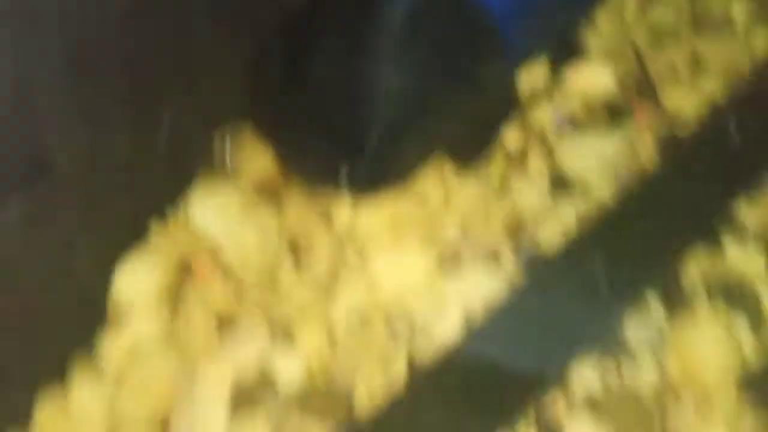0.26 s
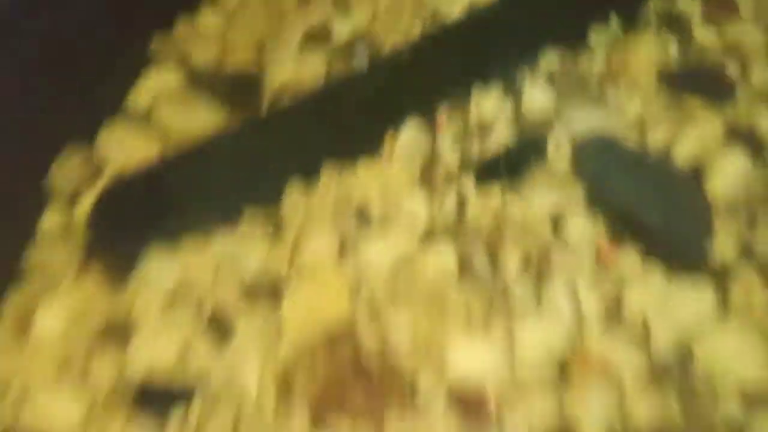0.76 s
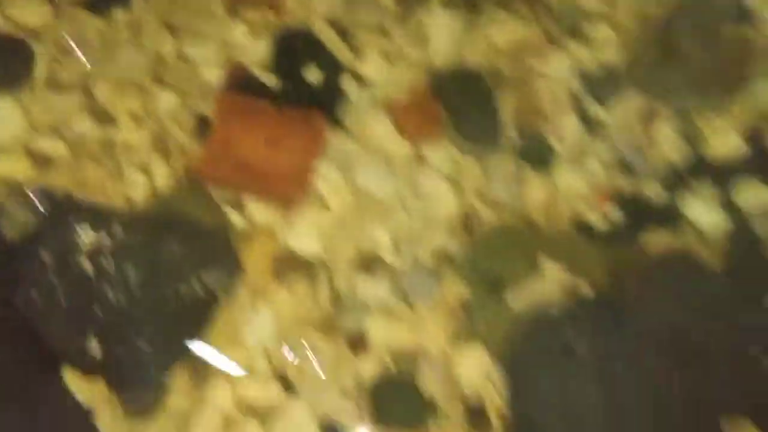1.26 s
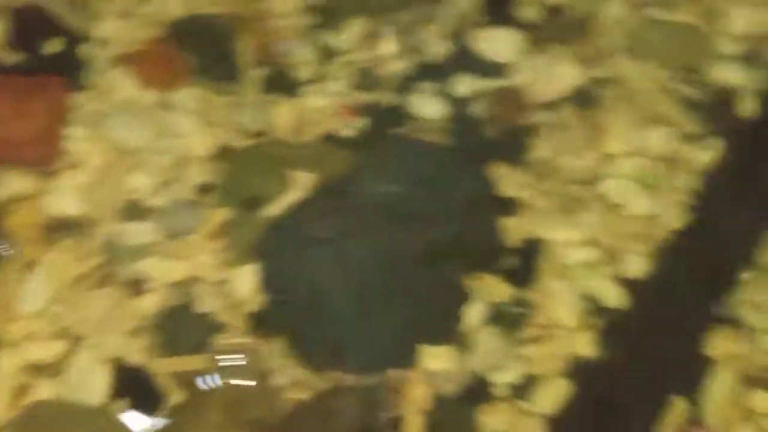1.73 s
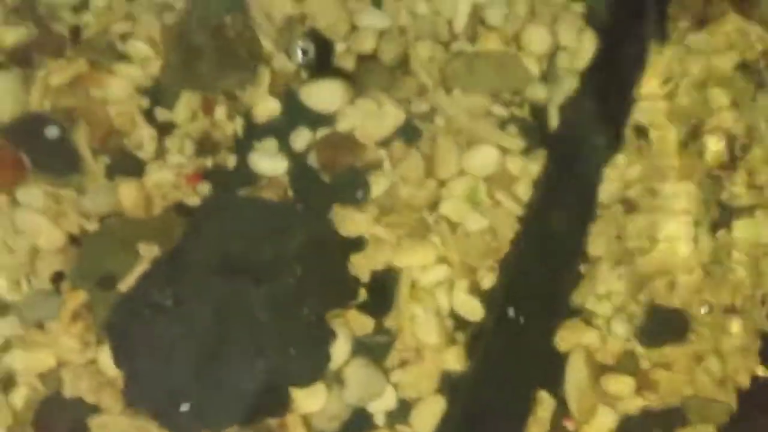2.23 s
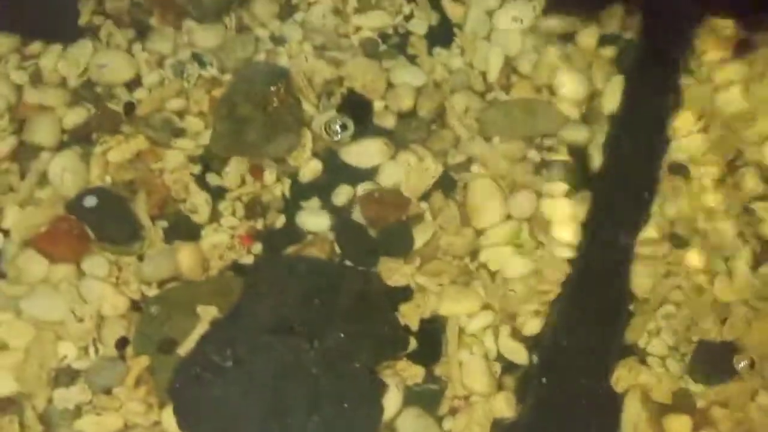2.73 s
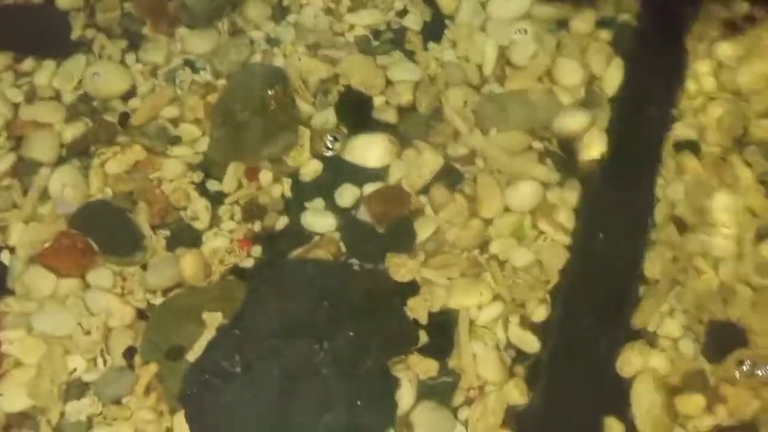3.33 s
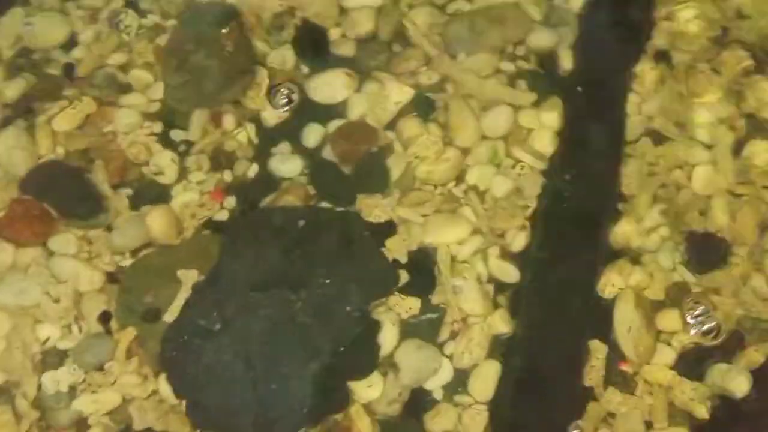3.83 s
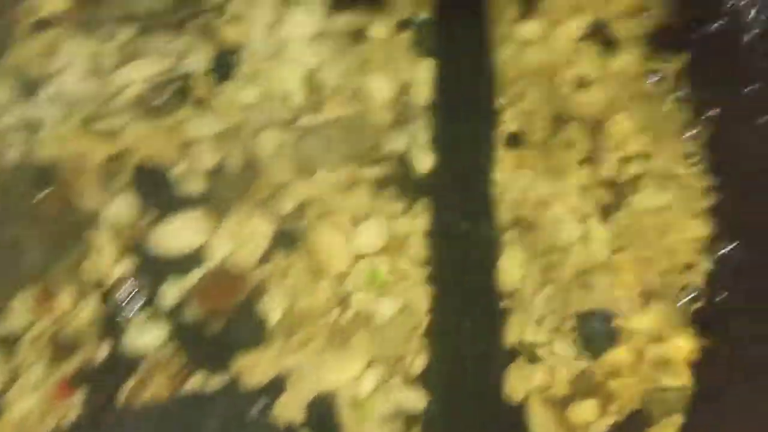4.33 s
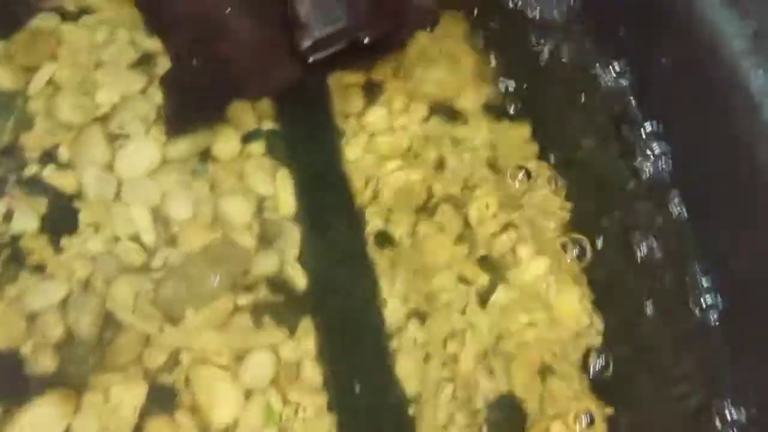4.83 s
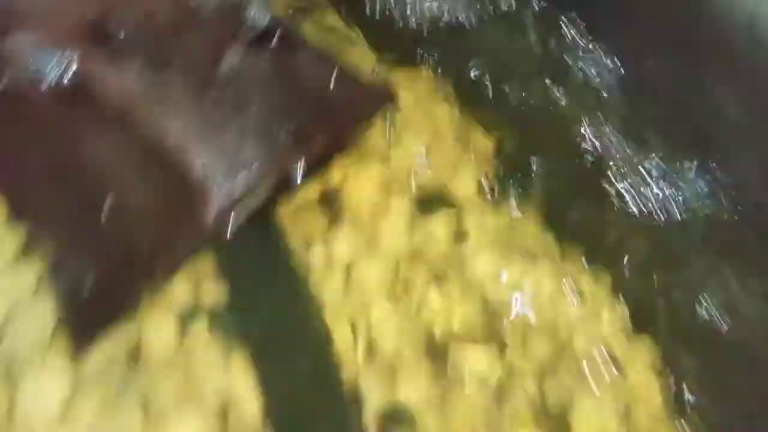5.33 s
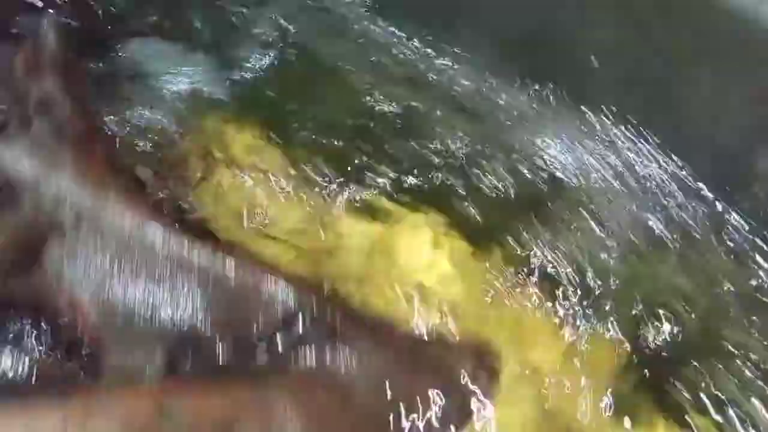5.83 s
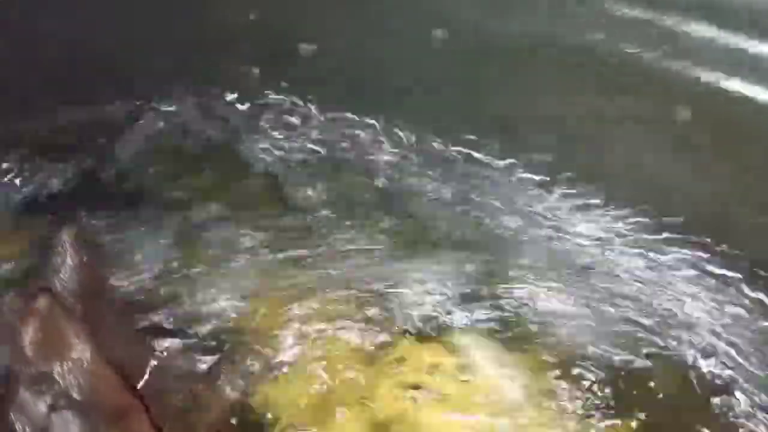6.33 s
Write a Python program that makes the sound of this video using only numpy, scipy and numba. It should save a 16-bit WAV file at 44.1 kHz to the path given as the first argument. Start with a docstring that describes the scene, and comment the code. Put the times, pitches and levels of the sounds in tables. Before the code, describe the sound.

An aquarium filter pump hums steadily while water bubbles, gurgles and fizzes in an indoor tub.

```python
"""Filter pump bubbling in an indoor tub

A pump under water hums at twice the mains rate, over a faint room rumble. Its outflow drags air under:
big bubbles gurgle, small ones fizz, pop and spit, and the air in the tub colours the steady churning.
The water echoes off the walls, and the echoes shift as a phone drifts above the surface."""
import sys
import numpy as np
from scipy import signal
from scipy.fft import rfft, irfft
from scipy.io import wavfile
from scipy.ndimage import uniform_filter1d
from numba import njit

SR = 44100
rng = np.random.default_rng(int(sys.argv[2]) if len(sys.argv) > 2 else 0)


def transcribe(u):
    """Save the signal u as a 16-bit wav file named by the first command-line argument.

    u: samples, shape (n,) or (channels, n), limited to [-1, 1]; the rate is SR.
    q: integer samples, one column per channel.
    """
    v = np.clip(np.atleast_2d(u).T, -1, 1)
    q = np.round(v * 32767).astype(np.int16)
    wavfile.write(sys.argv[1], SR, q)


N = 289296

# How loud the pump hums. Each row: time in seconds, level in dB.
HUM_LEVELS = [(0.0, -28.5), (0.03, -28), (0.56, -29.5), (0.66, -28), (1.42, -32.5), (1.64, -32),
              (1.95, -34), (2.19, -32), (2.56, -33.5), (5.02, -32.5), (5.22, -35), (5.32, -30.5),
              (5.44, -32.5), (5.75, -31), (6.21, -33), (6.28, -30.5), (6.52, -31), (6.56, -31)]


def undb(db):
    """Turn decibels into a number to multiply by."""
    return 10 ** (np.asarray(db) / 20)


def unit(x):
    """Scale a sound to an average power of 1."""
    return x / np.sqrt(np.mean(x ** 2))


def along(table):
    """Join a table's rows with straight lines: one curve for each column after the time."""
    times, *columns = np.transpose(table)
    return [np.interp(np.arange(N) / SR, times, column) for column in columns]


def wander(per_second):
    """A smooth random wobble, mostly between -1 and 1."""
    hold = int(SR / per_second)
    steps = np.repeat(rng.standard_normal(N // hold + 1), hold)
    return 1.35 * uniform_filter1d(uniform_filter1d(steps, hold), hold)[:N]


def band_noise(edges_hz):
    """Steady noise between a low and a high frequency."""
    bandpass = signal.butter(2, edges_hz, "band", fs=SR, output="sos")
    return unit(signal.sosfilt(bandpass, rng.standard_normal(N)))


def bursts(table, edges_hz, rise_s):
    """Short puffs of noise at the times and levels of a table."""
    times, db = np.transpose(table)
    hits = np.zeros(N)
    hits[(times * SR).astype(int)] = undb(db)
    age = np.arange(SR // 10) / SR / rise_s
    puff = np.e * age * np.exp(-age)
    return signal.fftconvolve(hits, puff)[:N] * band_noise(edges_hz)


@njit
def ring(length, start, size, cycles_per_sample, swell, rise):
    """Each bubble swells, then fades more slowly; its pitch climbs as it nears the surface."""
    out = np.zeros(length)
    for k in range(len(start)):
        phase = 0.
        for j in range(min(int(9 * swell[k]), length - start[k])):
            age = j / swell[k]  # 1 at the loudest moment
            phase += cycles_per_sample[k] * (1 + rise * (age - 1) / 2)
            out[start[k] + j] += size[k] * age * np.exp(1 - age) * np.sin(2 * np.pi * phase)
    return out


def bubbles(times, db, hz, cycles, rise):
    """Ringing bubbles; each time falls partway up the swell, and rise sets how fast the pitch climbs."""
    swell = np.maximum(cycles, 1.) * SR / hz / 2.45  # a ring stays within 6 dB for 2.45 swell times
    start = np.clip((times * SR - .6 * swell).astype(np.int64), 0, N - 1)
    return ring(N, start, undb(db), hz / SR, swell, rise)


def clusters(times, db, hz, cycles, rise, pitch_spread, follower_db=-10, trail_rings=1.212):
    """A bubble seldom comes alone: two weaker ones of nearly its size follow and roughen its ring."""
    out = bubbles(times, db, hz, cycles, rise)
    lags, detunes = rng.random((len(times), 2, 2)).T
    for lag, detune in zip(lags, detunes):
        later = times + trail_rings * lag * cycles / hz
        nearby_hz = hz * (1 + pitch_spread * (detune - .5))
        out += bubbles(later, db + follower_db, nearby_hz, cycles, rise)
    return out


def room_rumble():
    """Faint low noise of the room under the hum."""
    # Bands of rumble. Each row: frequency in Hz, level in dB.
    bands = [(35, -69), (82, -55.5)]
    return sum(band_noise([hz / 1.06, hz * 1.4]) * undb(db) for hz, db in bands)


def pump(hum_hz=100.11):
    """The motor's magnetic pull shakes the tub twice per mains cycle; a weak overtone rides on top."""
    phase = 2 * np.pi * hum_hz * np.arange(N) / SR + 0.21 * wander(6.6)
    overtone = undb(-25 + 2.5 * wander(8.3)) * np.cos(2 * phase + 1.2)
    level_db = along(HUM_LEVELS)[0] + 0.57 * wander(12)
    return np.sqrt(2) * undb(level_db) * (np.cos(phase) + overtone)


def tub_colour(x, low_hz, high_hz):
    """Keep one band of a sound, shaped by the water's tone and the ringing air in the tub."""
    # The tone of churning water. Each row: frequency in Hz, relative level in dB.
    water_tone = [(71, -24), (120, -13.5), (151, -13), (193, -12.5), (261, -17), (406, -20.5), (538, -21.5),
                  (701, -26), (946, -37.5), (2090, -38.5), (2930, -41.5), (4390, -37.5), (6590, -40.5),
                  (8150, -63.5), (10600, -97), (17900, -120)]
    # Pitches at which the tub's air rings. Each row: frequency in Hz, width in Hz, boost in dB.
    resonances = [(198.8, 15, 3.5), (317, 41, 5.5), (404.7, 32, 8.5), (690, 63, 6.5), (876, 61, 6.5),
                  (1008, 44, 4), (1554, 100, 4), (1754, 32, 6), (1950, 560, 3), (2143, 90, 4),
                  (2580, 550, 0.5), (2685, 82, 4), (3420, 380, 2.5), (4230, 980, 5), (4850, 250, 2)]
    hz = np.maximum(np.arange(N // 2 + 1) * SR / N, 1)
    water_hz, water_db = np.transpose(water_tone)
    db = np.interp(np.log(hz), np.log(water_hz), water_db)
    db += sum(boost / (1 + (2 * (hz - centre) / width) ** 2) for centre, width, boost in resonances)
    soft_edges = 1 / np.sqrt((1 + (low_hz / hz) ** 8) * (1 + (hz / high_hz) ** 8))
    return irfft(rfft(x) * undb(db) * soft_edges, N)


def churn(low_hz, high_hz, count, cycles, spread_db, over_blur_db, flicker_db, surge):
    """One band of bubbles, scattered at random over the blur of countless fainter ones."""
    when, pitch, length = rng.random((count, 3)).T
    db = spread_db * np.clip(rng.standard_normal(count), -2, 2)
    hz = low_hz * (high_hz / low_hz) ** pitch
    rings = bubbles(when * N / SR, db, hz, cycles * (.5 + length), rise=.05)
    blur = rng.standard_normal(N) * undb(flicker_db * wander(18))
    blur_in_band = np.sqrt(2 * (high_hz - low_hz) / SR)
    water = blur + undb(over_blur_db) * blur_in_band * unit(rings)
    return tub_colour(water * surge, low_hz, high_hz)


def outflow():
    """The outflow drags air under as five sizes of bubble, which surge together and slowly swell."""
    # Bubble sizes, big to small. Each row: lowest and highest pitch in Hz, bubbles per band, typical
    # cycles of ringing, spread of levels in dB, level over the blur in dB, flicker of the blur in dB.
    sizes = [(116, 260, 170, 4.3, 0, -2.5, -1), (262.5, 992, 260, 6.16, 0.5, -7.5, 1.5),
             (999.5, 2700, 500, 20, 1, -1.5, 1.17), (2719, 3900, 700, 25, -0.5, 8, 1.4),
             (3870, 9500, 1100, 25, 4, -2.5, 1.5)]
    # Swells of fizz. Each row: time in seconds, level of the finest and of the middle bubbles in dB.
    fizz = [(0.0, -49.5, -53.5), (0.36, -49.5, -52), (0.4, -44.5, -54), (0.46, -50, -49.5),
            (0.51, -49.5, -54.5), (0.58, -50, -51), (0.64, -50, -56), (0.71, -48.5, -49),
            (0.91, -52, -55.5), (1.3, -50.5, -53), (1.5, -49.5, -52.5), (1.6, -48, -54.5),
            (1.7, -51.5, -53), (1.85, -48.5, -57), (2.02, -50.5, -54), (2.14, -50.5, -47.5),
            (2.17, -50, -54.5), (2.89, -49, -55.5), (3.07, -50.5, -53.5), (3.2, -51, -54),
            (4.31, -49.5, -53.5), (4.48, -54, -56), (4.58, -45, -50.5), (4.69, -47, -52.5),
            (4.77, -49, -51.5), (5.11, -45, -53), (5.19, -51, -56), (5.6, -49, -53), (5.9, -47.5, -56),
            (6.15, -48, -56), (6.41, -49.5, -53), (6.52, -47.5, -58.5), (6.56, -46, -53)]
    # Swells of fine bubbles. Each row: time in seconds, level in dB.
    trickle = [(0.0, -55.5), (0.13, -49.5), (0.18, -54.5), (0.86, -51), (1.09, -53), (1.75, -55.5),
               (1.9, -48), (1.97, -52.5), (2.36, -55), (4.2, -55), (4.31, -52), (4.79, -54), (5.11, -51.5),
               (5.15, -50), (5.52, -55.5), (5.94, -52), (6.52, -55.5), (6.56, -57)]
    # Swells of large bubbles. Each row: time in seconds, level in dB.
    large = [(0.0, -52), (0.38, -52), (0.62, -49.5), (1.26, -51.5), (1.84, -49.5), (2.01, -51),
             (2.98, -48.5), (3.2, -52.5), (3.38, -53), (3.54, -49.5), (4.79, -50), (5.04, -48.5),
             (5.37, -51), (5.63, -48), (6.27, -48), (6.56, -45.5)]
    # How loud each size is. Each row: average level in dB, the shares it takes of the hum, finest,
    # middle, fine and large swells, and its change in dB as the phone drifts to the outflow.
    loudness = [(-48, 0.4, .05, 0.045, .03, .1, -1.8), (-49.5, 0.04, 0.059, 0.12, 0.027, .9, .5),
                (-52.5, 0.054, 0.046, 0.77, .12, .05, 0.7), (-53.5, 0.1, 0.09, .05, 1, .03, -0.6),
                (-49, 0.067, 0.75, .05, .06, .03, -0.2)]
    surge = undb(0.74 * wander(40))
    drift = np.arange(N) / N
    curves = along(HUM_LEVELS) + along(fizz) + along(trickle) + along(large) + [drift]
    swells = np.array([curve - curve.mean() for curve in curves])  # only the ups and downs count
    out = np.zeros(N)
    for (low_hz, high_hz, count, *texture), (db, *shares) in zip(sizes, loudness):
        edges = np.geomspace(low_hz, high_hz, num=4)  # three bands for each size
        water = sum(churn(low, high, int(count), *texture, surge) for low, high in zip(edges, edges[1:]))
        out += unit(water) * undb(db + np.array(shares) @ swells)
    return out


def spray():
    """Bursting bubbles spit spray in tiny, bright ticks."""
    # Spits of spray. Each row: start in seconds, level in dB.
    spits = [(0.54, -57), (0.659, -50), (2.33, -51), (3.24, -50), (4.875, -55), (4.915, -58), (5.38, -58),
             (5.965, -57), (6.09, -60), (6.449, -55), (6.508, -44.5)]
    return bursts(spits, edges_hz=(3600, 7000), rise_s=.0013)


def singing_bubbles():
    """Small bubbles that sing on a little longer in the air of the tub."""
    # Each row: time in seconds, peak level in dB, pitch in Hz, milliseconds within 6 dB of the peak.
    long_rings = [(0.018, -49, 1750, 13.5), (0.04, -43, 4260, 15), (0.068, -46, 4100, 12),
                  (0.162, -50, 2040, 15), (0.297, -45.5, 2050, 12), (0.309, -46, 3360, 13.5),
                  (0.338, -43.5, 3320, 12.5), (0.452, -49, 1750, 21), (0.545, -49, 1808, 18.5),
                  (0.59, -48, 3920, 13.5), (0.738, -48, 3300, 15), (0.808, -45, 3500, 12.5),
                  (0.832, -48, 3480, 11), (0.879, -51, 1640, 13), (2.43, -48, 1880, 11.5),
                  (2.45, -50, 2050, 12.5), (3.033, -49, 1733, 19), (3.07, -48, 2130, 20),
                  (3.33, -49, 2136, 13.5), (3.81, -47, 2050, 15), (3.826, -49, 1530, 11.5),
                  (3.84, -52, 2040, 15), (4.06, -54, 1900, 12), (4.105, -51, 1810, 14.5),
                  (4.155, -51, 1540, 14), (4.22, -49, 1860, 11.5), (3.86, -49, 1740, 17),
                  (4.263, -51, 1835, 18.5), (4.35, -46, 3560, 17.5), (4.571, -45, 3830, 11),
                  (4.575, -49, 4160, 16), (4.968, -52, 1835, 30.5), (5.048, -48, 2920, 17),
                  (5.121, -48, 4660, 13), (5.221, -50, 1930, 11.5), (5.224, -48, 2410, 10),
                  (5.341, -50, 3600, 14), (5.726, -39, 4300, 10), (6.128, -47, 4460, 10.5),
                  (6.333, -47.5, 1530, 13.5), (6.362, -47, 3300, 13), (6.408, -48, 3980, 11.5)]
    times, db, hz, ms = np.transpose(long_rings)
    return clusters(times, db, hz, ms * hz / 1000, rise=0.02, pitch_spread=.15)


def pops():
    """Small bubbles pop in loose clusters; the higher ones ring for more cycles."""
    # Each row: time in seconds, peak level in dB, pitch in Hz.
    small_bubbles = [(0.033, -37.5, 3520), (0.033, -39, 3940), (0.08, -41.5, 1750), (0.129, -36, 3900),
                     (0.132, -37, 3600), (0.349, -38.5, 2034), (0.243, -37, 4200), (0.332, -41, 5070),
                     (0.388, -33, 4140), (0.412, -40, 5530), (0.444, -37.5, 3325), (0.509, -42, 3260),
                     (0.459, -46, 2020), (0.643, -43, 4000), (0.657, -39, 3570), (0.658, -37, 4040),
                     (0.69, -44, 3540), (0.699, -40, 4180), (0.709, -42, 4300), (0.715, -44, 3750),
                     (0.744, -41, 3960), (0.732, -45, 1600), (0.868, -45, 1900), (0.879, -51, 1695),
                     (0.893, -42, 4330), (0.957, -43.5, 2780), (0.71, -44, 1830), (0.73, -35.5, 4060),
                     (0.737, -36.5, 3890), (0.761, -36, 4130), (0.779, -44, 1790), (0.864, -38, 3500),
                     (0.893, -39, 3560), (0.93, -41, 3800), (1.021, -42, 3460), (1.101, -43, 1680),
                     (1.428, -40, 1270), (1.563, -39, 4080), (1.594, -37.5, 3950), (1.833, -39, 5600),
                     (1.909, -39, 3730), (1.989, -41, 4600), (2.03, -39, 2160), (2.325, -41, 5470),
                     (2.334, -42, 5760), (2.35, -43, 5550), (2.418, -44, 1680), (2.815, -47, 1470),
                     (2.576, -37.5, 4250), (3.031, -50, 1750), (3.125, -45, 2140), (3.24, -40.5, 6240),
                     (3.722, -41, 4760), (3.809, -41, 2100), (3.921, -40, 3700), (4.01, -49, 2060),
                     (4.078, -47, 1490), (4.125, -49, 1920), (4.195, -45, 1900), (4.091, -39, 4560),
                     (4.136, -44, 1730), (4.301, -46, 1380), (4.348, -41.5, 2180), (4.496, -41, 3680),
                     (4.582, -37, 4540), (4.683, -41, 4000), (4.686, -43, 4500), (4.614, -41, 2070),
                     (4.874, -40.5, 6360), (4.88, -41, 4830), (4.915, -39, 5430), (5.028, -45, 4660),
                     (5.074, -40, 2450), (5.074, -43, 2700), (5.095, -47, 3000), (5.162, -44, 1900),
                     (5.338, -37, 4330), (5.379, -39.5, 5200), (5.401, -35, 4020), (5.462, -45, 2720),
                     (5.617, -36, 4160), (5.62, -40, 4440), (5.673, -38.5, 4240), (5.641, -42, 4160),
                     (5.704, -44, 4100), (5.799, -37, 4430), (5.861, -42, 3283), (5.89, -48, 3240),
                     (5.952, -40, 3380), (5.97, -43, 1630), (5.989, -38, 4570), (6.06, -38, 4420),
                     (6.09, -42, 6320), (6.111, -38, 4140), (6.164, -39, 5300), (6.208, -44, 1264),
                     (6.353, -38, 4020), (6.469, -42.5, 5940), (6.458, -40, 4070), (6.509, -35, 4330),
                     (6.509, -35, 4820), (6.509, -40, 5620)]
    times, db, hz = np.transpose(small_bubbles)
    cycles = 7 + 1.7 * hz / 1000
    return clusters(times, db, hz, cycles, rise=0.03, pitch_spread=.2, follower_db=-7, trail_rings=2)


def gurgles():
    """Big bubbles ring low; the surface slaps shut over some with a short, wet burst."""
    # Each row: time in seconds, peak level in dB, pitch in Hz, cycles within 6 dB of the peak.
    big_bubbles = [(0.12, -49, 690, 20), (0.28, -55, 680, 8), (0.387, -46.5, 623, 9),
                   (0.43, -44.5, 690, 14.5), (0.175, -34, 424, 3), (0.186, -41.5, 644, 8.5),
                   (0.454, -43, 830, 8), (0.542, -38, 424, 10), (0.556, -37, 680, 3.5),
                   (0.22, -41, 200, 6.5), (0.35, -43, 200, 6.5), (0.42, -35, 205, 7), (0.663, -34, 200, 7),
                   (0.779, -38.5, 215, 4), (0.824, -35, 217, 3), (0.877, -36, 262, 4.5),
                   (0.888, -44.5, 478, 10.5), (0.931, -45, 660, 13), (0.955, -40.5, 292, 7),
                   (1.055, -35, 213, 3.5), (1.058, -43, 664, 7), (1.12, -49, 667, 12),
                   (1.13, -41, 196, 5.5), (1.163, -46, 640, 7.5), (1.19, -32.5, 199, 6.5),
                   (1.276, -37.5, 277, 4), (1.314, -41.5, 207, 5), (1.375, -37.5, 205, 7),
                   (1.498, -40, 420, 3.5), (1.526, -35, 219, 3.5), (1.641, -40, 410, 9.5),
                   (1.66, -46, 680, 7.5), (1.705, -40.5, 215, 7), (1.607, -40, 268, 3.5),
                   (1.693, -48, 690, 8.5), (1.736, -37, 380, 6), (1.746, -36, 420, 6),
                   (1.815, -46, 402, 6.5), (1.768, -40.5, 194.6, 10), (1.856, -44, 397, 6.5),
                   (1.94, -40.5, 397, 6), (1.958, -35.5, 465, 5), (1.962, -36, 351, 6),
                   (2.036, -42, 382, 5.5), (1.959, -45, 700, 6), (2.046, -42, 680, 8.5),
                   (2.193, -48, 273, 5.5), (2.19, -45, 396, 13.5), (2.27, -39, 516, 9.5),
                   (2.276, -38.5, 414, 7.5), (2.598, -47, 415, 12.5), (2.403, -36.5, 360, 4),
                   (2.788, -36, 364, 4.5), (2.796, -46, 442, 4.5), (2.802, -43, 620, 3.5),
                   (2.826, -44, 607, 5), (2.957, -44.5, 612, 7.5), (2.972, -37.5, 355, 3.5),
                   (3.102, -40, 352, 4.5), (3.348, -48, 690, 7.5), (3.39, -43.5, 203, 14),
                   (3.2, -42, 408, 5), (3.26, -44.5, 400, 6.5), (3.345, -43.5, 350, 4.5),
                   (3.43, -42, 377, 7), (3.491, -43, 663, 5.5), (3.606, -43, 257, 5.5),
                   (3.613, -37.5, 404, 13), (3.69, -43, 846, 5), (3.787, -42, 338, 6.5),
                   (3.945, -35.5, 351, 4), (4.064, -34, 400, 5), (4.066, -49, 522, 9),
                   (4.165, -47, 364, 7.5), (4.297, -44, 1040, 9), (4.31, -37.5, 580, 7.5),
                   (4.325, -40, 587, 7.5), (4.315, -35.5, 402, 5.5), (4.425, -40.5, 387, 3),
                   (4.55, -38, 330, 6.5), (4.579, -42, 478, 6), (4.584, -45, 600, 14.5),
                   (4.745, -41, 500, 6.5), (4.91, -46.5, 497, 13.5), (5.044, -46, 490, 7.5),
                   (5.13, -41, 398, 6), (5.235, -45, 689, 8), (4.734, -35.5, 393, 5), (4.784, -40, 410, 4),
                   (4.862, -35, 360, 3.5), (5.045, -39, 374, 3), (5.12, -38.5, 310, 5.5),
                   (5.164, -42, 318, 9), (5.206, -39, 493, 4), (5.244, -40, 900, 3),
                   (5.377, -36.5, 454, 4.5), (5.474, -38.5, 297, 5.5), (5.575, -35, 301, 7.5),
                   (5.732, -41.5, 417, 10), (5.926, -39, 480, 0.5), (5.935, -29.5, 430, 1.5),
                   (5.9695, -29.5, 545, 2.5), (6.016, -42.5, 251, 5), (6.092, -35, 225, 3),
                   (6.145, -39, 193, 4.5), (5.77, -44, 202, 11), (6.1, -36, 307, 4), (6.13, -47, 710, 11),
                   (6.21, -39.5, 573, 5.5), (6.386, -37, 397, 10), (6.414, -37, 420, 2),
                   (6.4495, -34.5, 670, 1.5), (6.486, -39, 177, 4), (6.518, -42, 247, 10),
                   (6.546, -32, 403, 8.5)]
    # The surface slapping shut. Each row: start in seconds, level in dB.
    slaps = [(0.175, -53), (0.453, -60), (0.558, -48), (0.877, -53), (1.527, -51), (1.959, -51.5),
             (2.403, -52), (2.826, -53), (3.69, -60), (4.194, -50), (4.3, -51), (4.579, -53), (5.243, -52),
             (5.377, -52.5), (5.969, -43.5), (6.13, -51), (6.209, -47), (6.271, -54), (6.386, -59),
             (6.448, -53)]
    rings = clusters(*np.transpose(big_bubbles), rise=0.07, pitch_spread=.4)
    return rings + bursts(slaps, edges_hz=(595, 1780), rise_s=0.0056)


def wall_echoes(x, fade_s=.14, echo_db=-9, turns=6):
    """Echoes from tub and room walls smear the water; the phone drifts between two echo patterns."""
    t = np.arange(SR // 3) / SR
    tails = rng.standard_normal((2, len(t))) * undb(-60 * t / fade_s)
    here, there = (signal.fftconvolve(x, tail / np.sqrt(np.sum(tail ** 2)))[:N] for tail in tails)
    angle = 2 * np.pi * turns * np.arange(N) / N
    echoes = np.cos(angle) * here + np.sin(angle) * there
    return (x + undb(echo_db) * echoes) / np.sqrt(1 + undb(2 * echo_db))


def scene():
    """Hum, echoing water and room rumble, mixed into one channel."""
    hum = pump()
    water = outflow() + gurgles() + pops() + singing_bubbles() + spray()
    return (hum + wall_echoes(water) + room_rumble())[None]


def record(dry):
    """The phone steeply cuts the highest treble."""
    top_hz = 8150
    return signal.sosfilt(signal.ellip(8, .5, 70, top_hz, fs=SR, output="sos"), dry)


dry = scene()
out = record(dry)
transcribe(out)
```